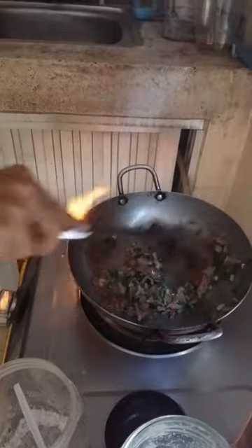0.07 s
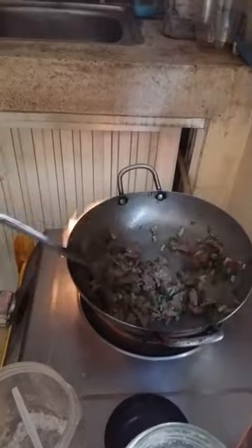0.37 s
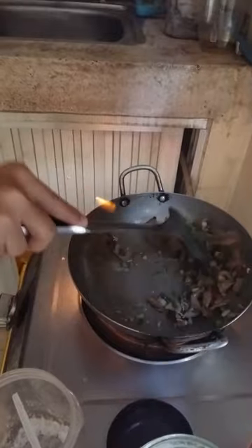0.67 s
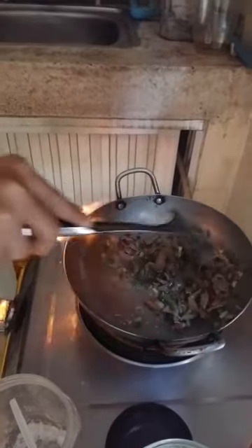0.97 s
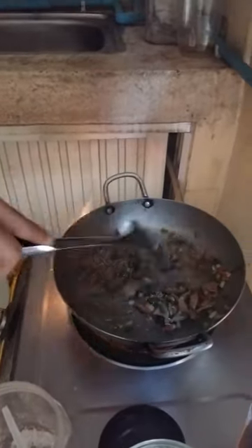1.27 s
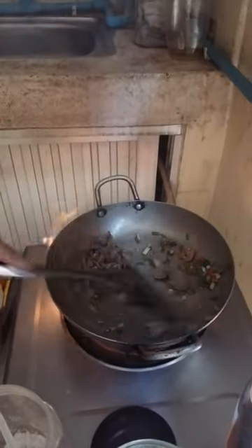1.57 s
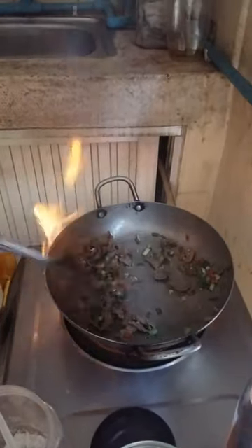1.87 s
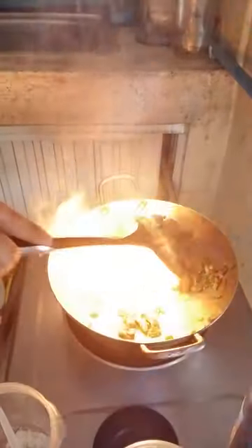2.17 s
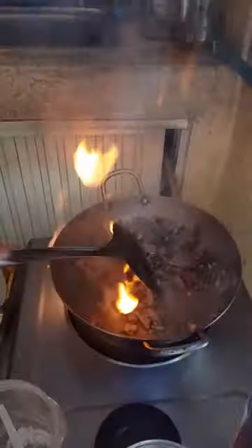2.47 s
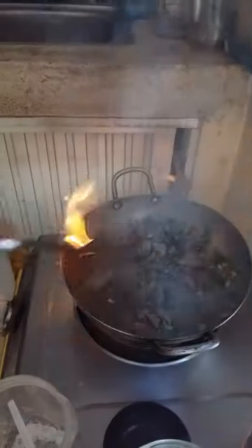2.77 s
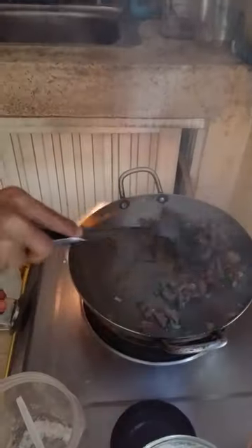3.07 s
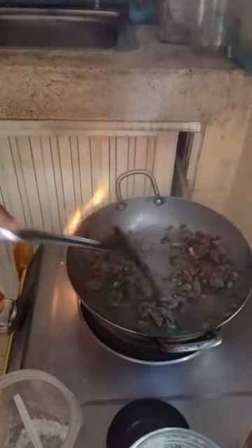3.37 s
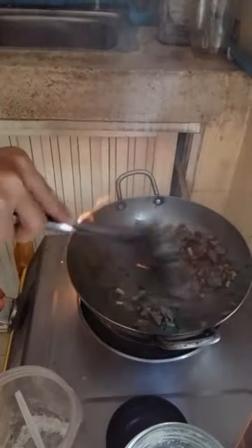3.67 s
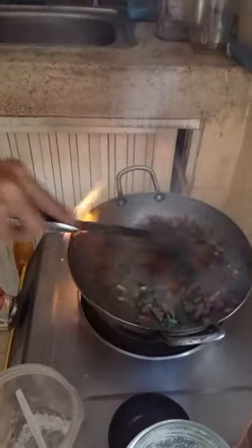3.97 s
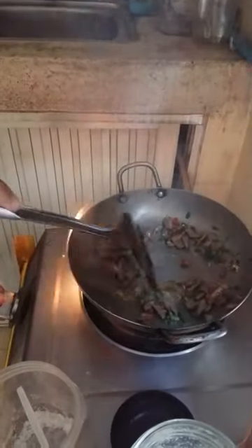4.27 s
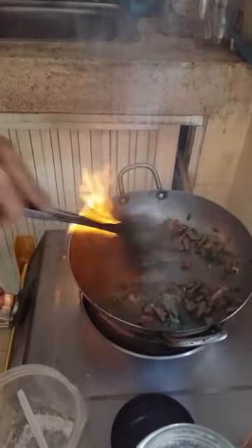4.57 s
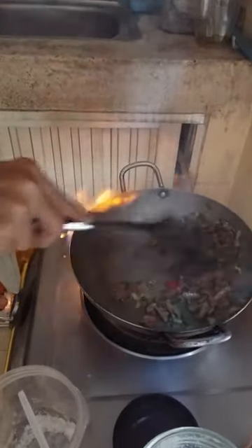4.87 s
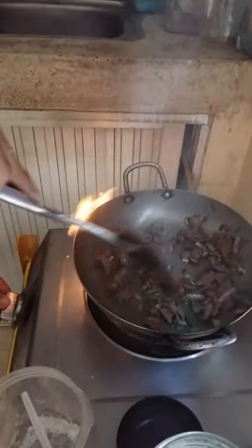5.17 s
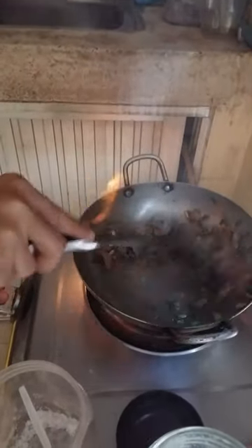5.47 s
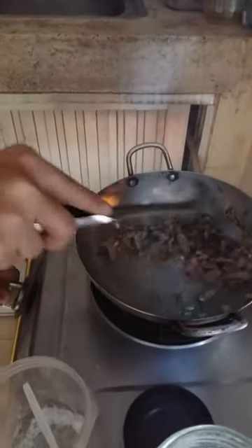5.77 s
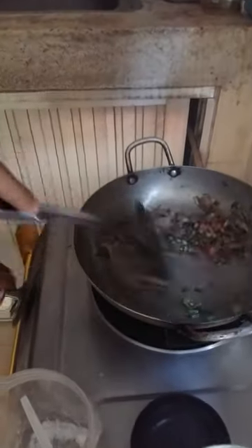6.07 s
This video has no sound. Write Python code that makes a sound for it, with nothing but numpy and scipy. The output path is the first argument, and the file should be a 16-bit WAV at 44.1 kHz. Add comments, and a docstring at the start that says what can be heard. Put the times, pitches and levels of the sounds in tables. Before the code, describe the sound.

Close to the microphone in a small kitchen, food fries in a hot wok with a steady, high hiss and fine spitting of oil. A metal spatula stirs it, giving short, damped clanks and rough scrapes against the steel, and the hiss flares with some strokes. A gas burner rumbles softly underneath. The sizzle grows a little stronger through the middle, then drops away near the end as the food is pushed aside.

```python
"""Meat and herbs sizzle in a steel wok in a small kitchen: countless tiny steam bursts over a gas flame.
From half a second on, a metal spatula knocks and scrapes the food-damped pan, which rocks on its ring;
the hiss flares briefly, and each stir swells the sizzle. A faint hum passes just after three seconds.
Near the end the food is pushed off the hot centre and the sizzle sinks.
All of it is heard close up, through a microphone port that rings near 6 kHz."""
import sys
import numpy as np
from scipy import signal
from scipy.fft import rfft, irfft
from scipy.io import wavfile

SR = 44100
rng = np.random.default_rng(int(sys.argv[2]) if len(sys.argv) > 2 else 0)


def materialize(psi):
    """Save the field psi as 16-bit PCM at rate SR to the path in sys.argv[1].

    A 1-D psi becomes a single channel; in a 2-D psi each row is a channel.
    """
    bounded = np.clip(np.atleast_2d(psi).T, -1, 1)
    quanta = np.round(bounded * 32767).astype(np.int16)
    wavfile.write(sys.argv[1], SR, quanta)


N = 269451
TIME = np.arange(N) / SR
AGE = TIME[:SR // 2]  # seconds since a blow
FFT_SIZE = 9 * 2 ** 15
FREQ = np.maximum(np.arange(FFT_SIZE // 2 + 1) * SR / FFT_SIZE, 1)


def amp(db):
    """Decibels to gain."""
    return 10 ** (np.asarray(db) / 20)


def fader(points):
    """Straight ramps between (time_s, level_db) points."""
    return np.interp(TIME, *np.transpose(points))


def level(x, db):
    """Set the rms of the middle of a stereo pair."""
    return x * amp(db) / np.std(x.mean(axis=0))


def pan(left_db):
    """Channel gains for a left minus right level."""
    return amp(np.array([[left_db], [-left_db]]) / 2)


def shape(x, gain):
    """Causal filter with the given gain at each frequency."""
    cepstrum = irfft(np.log(gain))[:FFT_SIZE // 2]
    cepstrum[1:] *= 2
    return irfft(rfft(x, FFT_SIZE) * np.exp(rfft(cepstrum, FFT_SIZE)))[..., :N]


def equalise(x, points):
    """EQ through (freq_hz, gain_db) points; white noise keeps its power."""
    hz, db = np.transpose(points)
    gain = amp(np.interp(np.log(FREQ), np.log(hz), db))
    return shape(x, gain / np.sqrt(np.mean(gain ** 2)))


def noise(correlation, size=N):
    """Stereo white noise: correlation 1 is mono, 0 is wide."""
    mid, side = rng.standard_normal((2, size))
    return np.sqrt((1 + correlation) / 2) * mid + np.sqrt((1 - correlation) / 2) * np.array([side, -side])


def drift(rate_hz):
    """A random wander of unit spread."""
    knots = rng.standard_normal(2048)
    wander = np.interp(TIME * rate_hz, np.arange(len(knots)), knots)
    return wander / wander.std()


def decay(t60_s):
    """Half a second of exponential decay."""
    return np.exp(-np.log(1000) * np.minimum(AGE / t60_s, 10))


def bump(centre_s, half_width_s):
    """A brief bell-shaped swell."""
    return np.exp(-((TIME - centre_s) / half_width_s) ** 2)


def add(out, x, start_s):
    """Mix a short sound in at a time."""
    start = int(start_s * SR)
    out[:, start:start + x.shape[-1]] += x[..., :N - start]


def bursts(per_s, spread_db, t60_s, correlation):
    """Random steam bursts, many small and a few large, each with a short echo off pan and walls."""
    sizes = amp(spread_db * np.minimum(rng.exponential(size=N), 2 * np.pi))
    energy = (rng.random(N) < per_s / SR) * sizes ** 2
    direct, echo = decay(t60_s) ** 2, decay(0.21) ** 2
    power = signal.fftconvolve(energy, direct / direct.sum() + echo / echo.sum())[:N]
    return noise(correlation) * np.sqrt(np.abs(power))


# how hard the food fries between stirs: time_s, fader_db
FRYING_FADER = [(0.0, -24.5), (1.2, -26), (2.3, -21), (3.2, -23), (4.0, -23), (4.4, -20), (5.47, -21.5),
                (5.53, -30), (5.82, -35.5), (6.11, -38)]
# the sizzle dips briefly: centre_s, half_width_s, gain_db
SIZZLE_DIPS = [(.496, 0.0052, -13), (1.246, .008, -2.5), (5.391, 0.014, -6)]
# brief bright flares of hiss, mostly as the spatula strikes or scrapes: centre_s, boost_db
HISS_FLARES = [(.511, 11), (.609, 4), (4.372, 2), (4.678, 6.5)]
# tone of the bubbling (fuller lows on the left), the steam and the oil: freq_hz, gain_db
BUBBLE_LEFT_EQ = [(100, -36), (300, -21.5), (600, -13), (1150, -6), (1700, -1.5), (2900, -4), (4200, -3),
                  (5500, -5), (8000, -43)]
BUBBLE_RIGHT_EQ = [(100, -33), (300, -29), (600, -9), (1150, -7.5), (1700, 2), (2900, 1.5), (4200, 2),
                   (5500, -4), (8000, -44)]
STEAM_EQ = [(2500, -43.5), (4000, -23.5), (5200, -4), (6300, 1), (8000, -3.5), (9500, -8.5), (13000, -50)]
OIL_EQ = [(5000, -55), (8000, -3), (9800, -1), (13000, 3), (16000, 0.4)]


def sizzle():
    """Water bubbles out of the food, flashes to steam on the steel and throws a fine spray of oil."""
    dip_db = sum(db * bump(centre_s, half_width_s) for centre_s, half_width_s, db in SIZZLE_DIPS)
    flare_db = sum(db * bump(centre_s, half_width_s=0.016) for centre_s, db in HISS_FLARES)
    follow_db = 0.59 * flare_db  # bubbles and oil follow a flare only in part
    steam_db, oil_db, bubble_db = stirring()
    bubbles = bursts(per_s=6300, spread_db=2.5, t60_s=0.0011, correlation=0.46)
    steam = bursts(per_s=3400, spread_db=0.6, t60_s=0.003, correlation=0.16)
    oil = bursts(per_s=5700, spread_db=3.0, t60_s=0.005, correlation=-0.11)
    bubbling = np.array([equalise(bubbles[0], BUBBLE_LEFT_EQ), equalise(bubbles[1], BUBBLE_RIGHT_EQ)])
    bubbling = level(bubbling, -11) * amp(bubble_db + follow_db) * pan(1.0)
    hiss = level(equalise(steam, STEAM_EQ), -13) * amp(steam_db + flare_db) * pan(-3.5)
    spray = level(equalise(oil, OIL_EQ), -9.5) * amp(oil_db + follow_db)
    return (bubbling + hiss + spray) * amp(fader(FRYING_FADER) + dip_db)


# rise and fall of the gas flame: time_s, fader_db
FLAME_FADER = [(0.0, -59.5), (0.58, -53), (1.09, -62.5), (2.94, -54.5), (3.59, -55), (4.59, -55.5),
               (5.27, -56.5), (5.92, -66.5), (6.11, -52.5)]
# tone of its roar and its flutter: freq_hz, gain_db
ROAR_EQ = [(20, -25), (45, -8), (65, -11.5), (120, 2.5), (200, 1), (350, 3.5), (700, 3.5), (1500, -15),
           (5000, -29)]
FLUTTER_EQ = [(60, -25), (250, -23), (500, -3), (1200, -3), (4000, -42)]


def flame():
    """Burning gas makes a low mono roar with a wide flutter above it."""
    roar = equalise(noise(1.0), ROAR_EQ)
    flutter = 0.25 * equalise(noise(0), FLUTTER_EQ)
    flame_db = fader(FLAME_FADER) + 1.4 * drift(17)
    return level(roar + flutter, 4.2) * amp(flame_db) * pan(1.3)


def contact(force, cutoff_hz):
    """A soft, long push loses its treble; a short, glancing touch loses its bass."""
    soft = signal.sosfilt(signal.butter(2, cutoff_hz, fs=SR, output="sos"), force)
    return signal.sosfilt(signal.butter(1, cutoff_hz / 4, "high", fs=SR, output="sos"), soft)


# spatula hits: start_s, force_db, cutoff_hz, click_db, bounce_gap_s, first_bounce_db (relative to the hit)
SPATULA_KNOCKS = [(.503, -21, 4000, -19, 0.027, -2.5), (.607, -31, 3000, -22, .01, -12),
                  (1.254, -15, 1650, -23.5, .007, -5), (1.63, -27, 1400, -44, 0.037, -3),
                  (2.149, -27.5, 1200, -38, .03, -12), (2.858, -13.5, 1170, -17, .035, -8),
                  (4.019, -19, 1300, -42, .008, -10), (4.116, -15.5, 1550, -19.5, 0.013, -4),
                  (4.589, -23, 3200, -26, 0.033, -10), (5.399, -12.5, 2740, -13.5, .021, -12),
                  (5.442, -19, 850, -37, .03, -7), (6.005, -30.5, 1700, -37, .01, -14)]
# tone of the blade's click: freq_hz, gain_db
CLICK_EQ = [(300, -41), (1500, -3), (3500, -11), (6000, 17), (9000, 17), (16000, -14)]


def knocks():
    """The blade clicks on the steel and bounces twice, weaker and duller: gives forces and clicks."""
    bounce_loss_db, cutoff_kept = 2.5, 0.6
    impulse = signal.unit_impulse(len(AGE))
    forces, clicks = [], np.zeros((2, N))
    for start_s, force_db, cutoff_hz, click_db, gap_s, first_bounce_db in SPATULA_KNOCKS:
        bounce_db = force_db + first_bounce_db
        for bounce, touch_db in enumerate([force_db, bounce_db, bounce_db - bounce_loss_db]):
            push = amp(touch_db) * contact(impulse, cutoff_hz * cutoff_kept ** bounce)
            forces.append((start_s + bounce * gap_s, push))
        envelope = decay(0.015) + 0.04 * decay(0.18)  # dry crack, faint echo
        add(clicks, amp(click_db) * noise(0.077, len(AGE)) * envelope, start_s)
    return forces, equalise(clicks, CLICK_EQ) * pan(-2.0)


# wok modes, damped by food and burner ring: pitch_hz, relative_db, t60_s
WOK_MODES = [(172.5, -3, 0.13), (345, 3.5, 0.14), (402, -0.5, 0.15), (568, -1.5, 0.34), (720, -6, 0.17),
             (902, -7.5, 0.35), (990, -25, 0.32), (1048, -2.5, 0.26), (1217, -2.5, 0.22),
             (1170, -48, 0.087), (1480, 8.5, 0.064), (1590, 5, 0.08), (1672, 10, 0.046), (1717, 3.5, 0.13),
             (2360, 5, 0.087), (2400, 3, 0.14), (2490, 7.5, 0.2)]
# tone of the pan's clatter: freq_hz, gain_db
CLATTER_EQ = [(30, -1), (110, -11.5), (320, -3), (560, 2.5), (900, 3), (1800, 3), (2600, 5), (3200, -7),
              (9000, -11)]


def wok(forces):
    """The pan answers each (start_s, force) with its modes and a clatter that the kitchen prolongs."""
    modes = np.array([amp(db) * decay(t60_s) * np.exp(2j * np.pi * hz * AGE)
                      for hz, db, t60_s in WOK_MODES])
    modes_db, room_db = -19.5, -16
    ring, clatter = np.zeros((2, 2, N))
    for start_s, force in forces:
        # every spot on the pan rings differently
        spot, phase, *channel_phases = rng.standard_normal((4, len(modes)))
        weights = amp(modes_db + 2 * spot) * np.exp(1j * (np.pi * phase + np.array(channel_phases)))
        direct = noise(0.43, len(AGE)) * decay(0.039)
        room = amp(room_db) * noise(0.15, len(AGE)) * decay(0.55)
        add(ring, signal.fftconvolve(force[None], np.imag(weights @ modes), axes=1), start_s)
        add(clatter, signal.fftconvolve(force[None], direct + room, axes=1), start_s)
    return (ring + equalise(clatter, CLATTER_EQ)) * pan(3.4)


# blade strokes along the steel: start_s, length_s, force_db, cutoff_hz
SPATULA_SCRAPES = [(.507, 0.21, -30.5, 1420), (1.263, 0.078, -30.5, 1100), (1.599, 0.26, -32, 1210),
                   (2.139, 0.34, -40, 800), (2.858, 0.12, -25, 1030), (2.97, .07, -34, 3500),
                   (3.722, 0.19, -38, 1300), (4.115, 0.11, -24.5, 1290), (4.225, 0.084, -27.5, 5030),
                   (4.612, 0.14, -28, 900), (4.67, 0.028, -40, 4530), (5.403, 0.12, -23.5, 1280),
                   (5.919, 0.11, -38, 1400), (5.979, .26, -44.5, 1110)]


def scrapes():
    """The edge sticks and slips in uneven steps: gives forces on the pan."""
    slips_per_s = 1400
    forces = []
    for start_s, length_s, force_db, cutoff_hz in SPATULA_SCRAPES:
        slips = (rng.random(len(AGE)) < slips_per_s / SR) * rng.uniform(-1.12, 1, len(AGE))
        progress = np.minimum(AGE / length_s, 1)
        # the blade bites quickly and eases off as food gathers under it
        pressure = np.minimum(10 * progress, 1) * (1 - progress)
        forces.append((start_s, amp(force_db) * contact(slips * pressure, cutoff_hz)))
    return forces


# thuds of the wok on the burner ring: start_s, gain_db, pitch_hz
RING_THUDS = [(.515, -23, 350), (2.887, -25, 229), (4.160, -21, 200), (4.599, -24, 327), (5.41, -23, 170),
              (5.958, -17.5, 247)]


def rocking():
    """The pushed wok tips with a few dull cycles, then drops back once, softer and lower."""
    settle_s, settle_db, settle_ratio = 0.024, -5, 0.74
    envelope = decay(0.022) - decay(0.0086)
    out = np.zeros((2, N))
    for start_s, gain_db, pitch_hz in RING_THUDS:
        phase = 2 * np.pi * pitch_hz * AGE
        add(out, amp(gain_db) * np.sin(phase) * envelope, start_s)
        add(out, amp(gain_db + settle_db) * np.sin(settle_ratio * phase) * envelope, start_s + settle_s)
    return signal.sosfilt(signal.butter(2, 60, "high", fs=SR, output="sos"), out) * pan(1.7)


# swells of the sizzle as the food is turned: start_s, length_s, steam_db, oil_db, bubble_db
STIR_SWELLS = [(0.618, 0.34, 2, 4, 3), (1.218, 0.22, 1.5, 2, 0.7), (1.662, 0.71, 2, 4, 0.8),
               (2.406, 0.43, 1.6, 3.5, 2.5), (2.888, 0.14, 3, 3.5, 3), (3.246, 0.33, 1.5, 5, 0.5),
               (3.606, 0.13, 2.5, 5, 1.7), (4.095, 0.41, 3, 3.5, -0.3), (4.636, 0.18, 0.7, 3.5, 0.2),
               (5.573, 0.11, 4, 5, 2)]


def stirring():
    """Wet food lands on hot steel: gives swells in dB for steam, oil and bubbles, held while it moves."""
    attack_s, release_s = 0.1, 0.099
    swells_db = np.zeros((3, N))
    for start_s, length_s, *layers_db in STIR_SWELLS:
        attack = np.clip((TIME - start_s) / attack_s, 0, 1)
        release = np.clip(1 - (TIME - start_s - length_s) / release_s, 0, 1)
        swells_db += np.outer(layers_db, attack * release)
    return swells_db


# tones of the passing hum: start_s, length_s, pitch_hz, waver_width_hz, level_db
HUM_TONES = [(3.132, 0.26, 217, 45, -53.5), (3.386, 0.41, 226, 44, -45), (3.44, 0.31, 360, 72.7, -49),
             (3.43, 0.23, 505, 13, -46)]


def hum():
    """Faint low tones waver in pitch and level."""
    out = np.zeros(N)
    for start_s, length_s, pitch_hz, waver_width_hz, level_db in HUM_TONES:
        progress = np.clip((TIME - start_s) / length_s, 0, 1)
        swell = np.sqrt(np.abs(np.sin(np.pi * progress)))
        phase = 2 * np.pi * np.cumsum(pitch_hz + waver_width_hz / 2 * drift(130)) / SR
        out += amp(level_db + 2 * drift(70)) * swell * np.sin(phase)
    return out * pan(3.6)


def scene():
    """The spatula plays the wok over a bed of sizzle, flame and hum."""
    bed = sizzle() + flame() + hum()
    knock_forces, clicks = knocks()
    return bed + clicks + wok(knock_forces + scrapes()) + rocking()


def record(dry):
    """The microphone port resonates, the loudest peaks are rounded and the top is cut."""
    port_hz, width_hz, leak_db, top_hz = 6265, 922, -9.5, 16200
    resonance = 1 / np.abs(1 - (FREQ / port_hz) ** 2 + 1j * FREQ * width_hz / port_hz ** 2)
    heard = shape(dry, np.hypot(resonance, amp(leak_db)))
    rounded = heard / (1 + heard ** 4) ** (1 / 4)
    return signal.sosfilt(signal.ellip(12, 0.2, 60, top_hz, fs=SR, output="sos"), rounded)


dry = scene()
out = record(dry)
materialize(out)
```